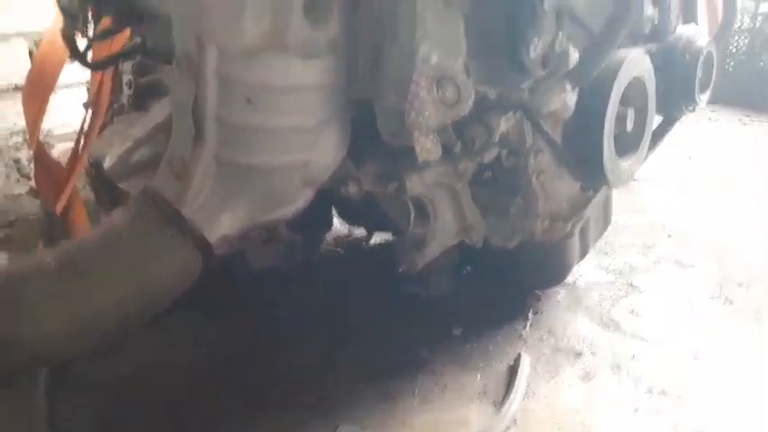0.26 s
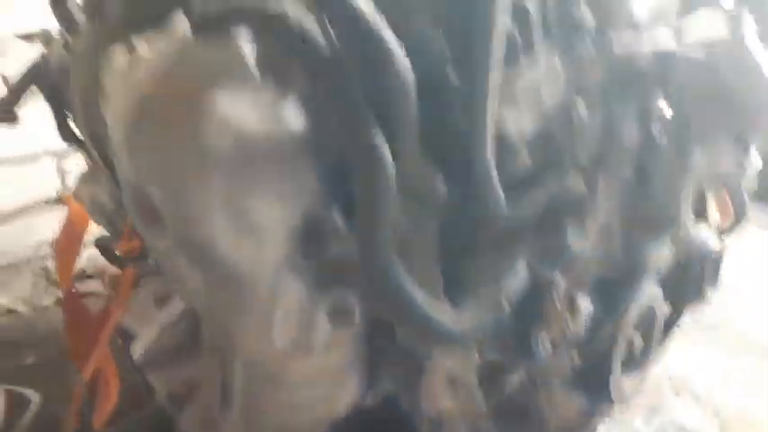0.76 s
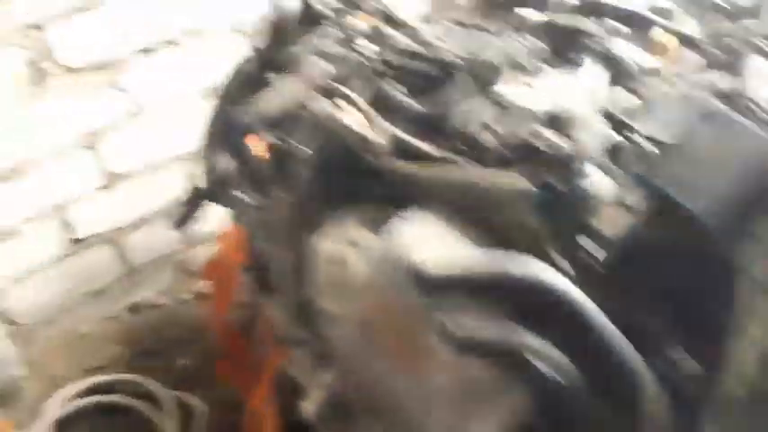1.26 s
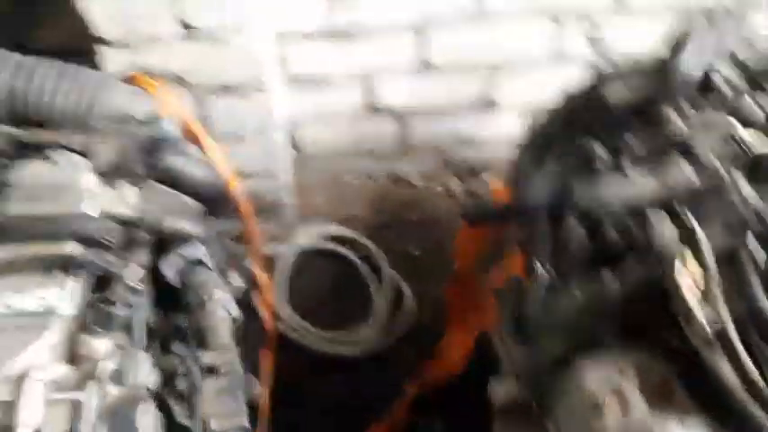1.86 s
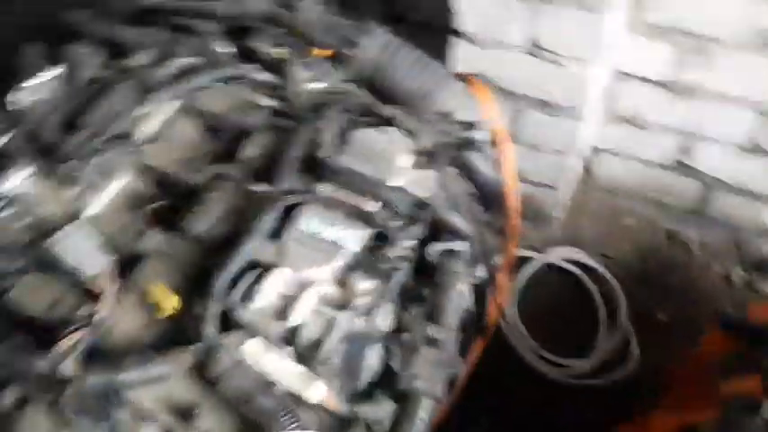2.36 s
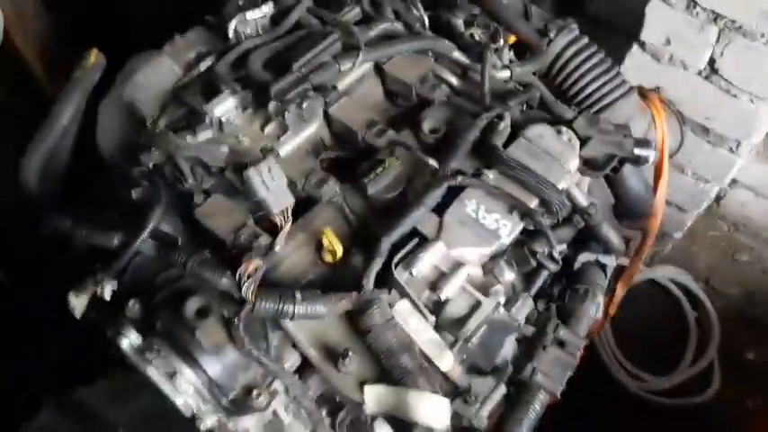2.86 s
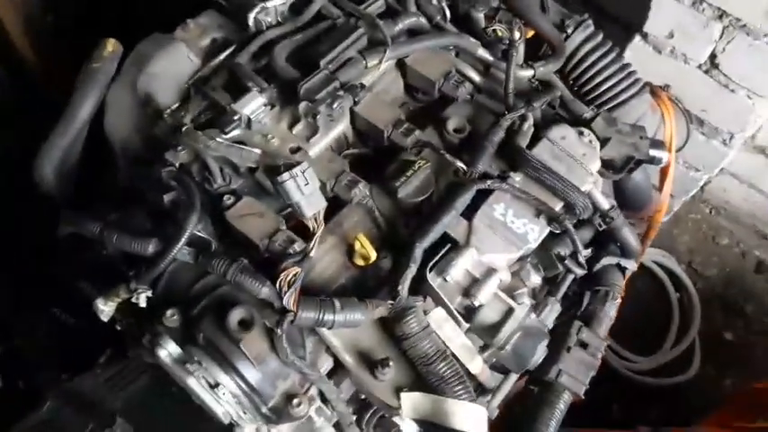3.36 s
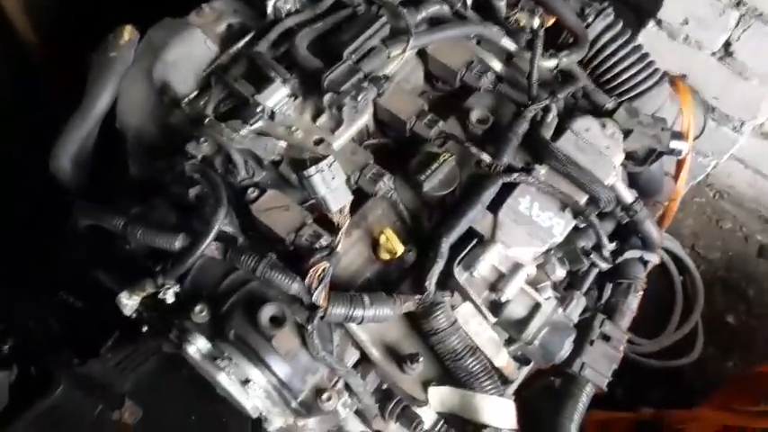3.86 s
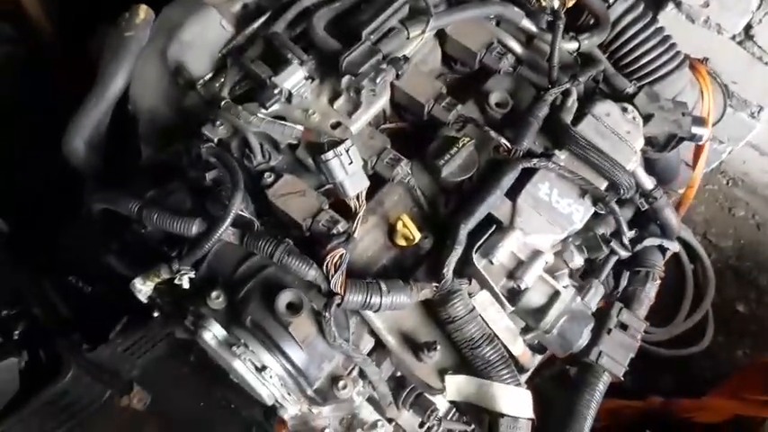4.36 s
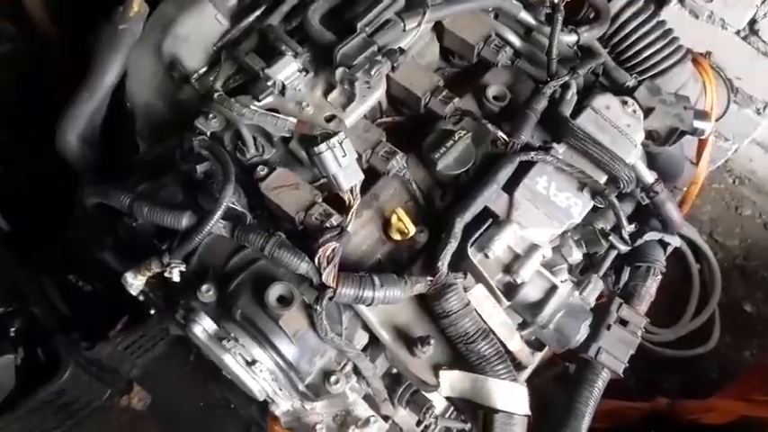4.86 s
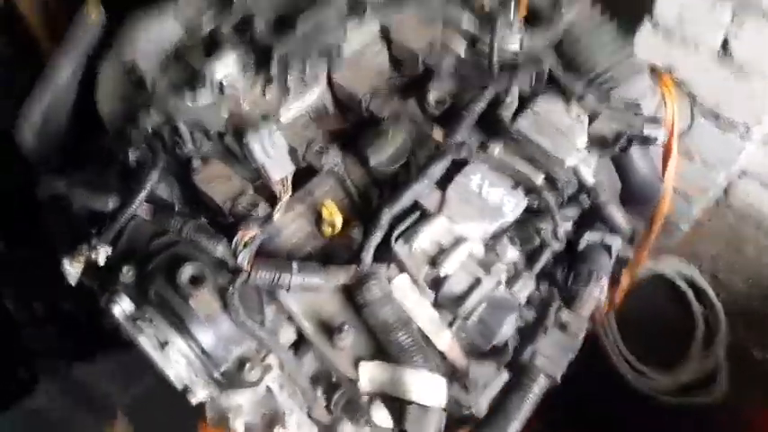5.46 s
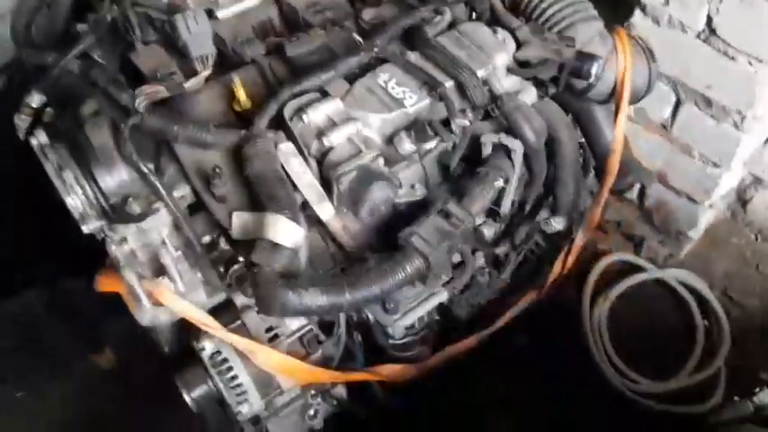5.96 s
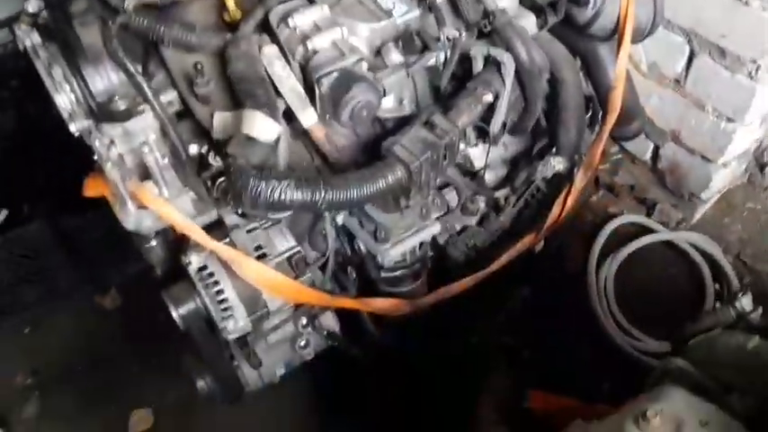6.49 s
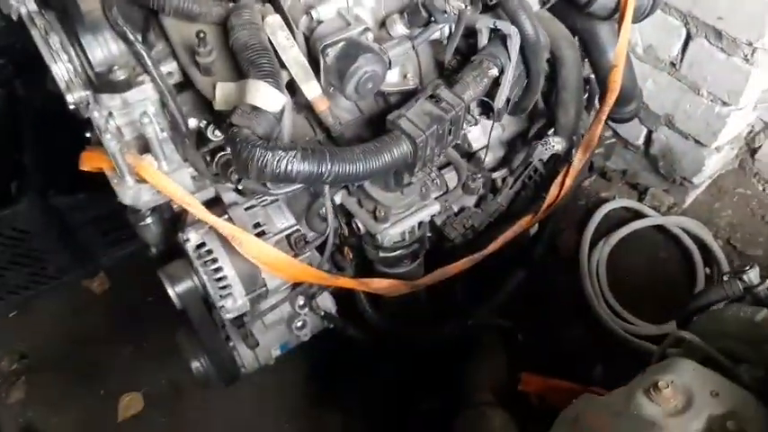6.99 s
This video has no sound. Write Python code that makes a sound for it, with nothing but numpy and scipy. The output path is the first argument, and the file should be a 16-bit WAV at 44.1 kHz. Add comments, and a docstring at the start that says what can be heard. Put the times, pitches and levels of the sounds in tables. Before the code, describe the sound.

Close, irregular handling noise from a handheld phone mixes with soles scuffing on gritty concrete. Light ticks and a cloth rustle come first, then a hard knock, the loudest sound. Bunches of clicks and crunchy scrapes come and go, with a short, quiet creak in a lull, and thin out near the end. Behind them the workshop is quiet, with a slight hiss and the faint hum of a far-off motor.

```python
"""Shuffling through a workshop

Someone shuffles over gritty concrete with a phone in the hand. Grit and the gripped case click, knock
and creak right at the microphone, each slip ringing a few damped resonances. Soles and fingers scuff
in between, and cloth rushes over the case as the phone is lifted at the start. Underneath sit a steady
room tone, a thin hiss and the faint hum of a far-off machine."""
import sys
import numpy as np
from scipy import signal
from scipy.fft import rfft, irfft
from scipy.io import wavfile
from scipy.ndimage import uniform_filter1d

SR = 44100
rng = np.random.default_rng(int(sys.argv[2]) if len(sys.argv) > 2 else 0)


def materialize(psi):
    """Save the field psi as 16-bit PCM at rate SR to the path in sys.argv[1].

    A 1-D psi becomes a single channel; in a 2-D psi each row is a channel.
    """
    bounded = np.clip(np.atleast_2d(psi).T, -1, 1)
    quanta = np.round(bounded * 32767).astype(np.int16)
    wavfile.write(sys.argv[1], SR, quanta)


N = 318825

# colour of the room tone: frequency_hz, relative_db
ROOM_SPECTRUM = [(25, -31), (42, -4.5), (75, -2.5), (145, -4), (195, -3), (361, -16.5), (487, -9.5),
                 (1300, -20.5), (4090, -31), (7600, -42.5), (10000, -41), (13000, -79)]
# drift of the distant motor: time_s, second_harmonic_hz, upper_harmonics_db, fundamental_db
MOTOR_DRIFT = [(0, 86.7, -79, -88), (.9, 82.5, -59.5, -67), (1.6, 87, -66.5, -69), (2.3, 95.8, -70, -69),
               (3.9, 96.8, -62.5, -64), (4.8, 96.14, -67.5, -64), (5.5, 97.8, -58, -63.5),
               (5.9, 95.6, -60, -66), (6.3, 96.4, -65.5, -71.5), (6.5, 95.5, -59.5, -78),
               (7.23, 95.3, -57, -69)]
# the motor's upper harmonics: multiple_of_second_harmonic, relative_db
MOTOR_HARMONICS = [(1, 0.5), (1.5, -16), (2, -8), (3, -19.5)]
# cloth sliding on the case: time_s, centre_hz, level_db
CLOTH_SWEEP = [(0, 2850, -62.5), (1.1, 2963, -57.5), (1.46, 3145, -58), (1.6, 3230, -99)]
# noise layers, a row each for scrape, rumble, grit, hiss: low_hz, high_hz, grains_per_s, scatter_db
NOISE_LAYERS = [(360, 1870, 300, 6), (97, 381, 55, -1), (1590, 3524, 380, 9.5), (10900, 17500, 650, -3.5)]
# bed of hand and clothes rubbing, plus a faint treble hiss that dips after the loudest knock:
# time_s, scrape_db, rumble_db, grit_db, hiss_db
NOISE_BED = [(0.0, -64.5, -59, -61.5, -71.5), (0.9, -50, -58, -59.5, -70), (1.45, -50, -56.5, -54.5, -69),
             (1.66, -60, -60, -58.5, -79), (2.06, -57, -72, -58.5, -90), (2.2, -67.5, -61, -66, -74.5),
             (2.75, -68.5, -70, -66, -74), (3.1, -57, -62, -66.5, -71.5), (3.9, -66.5, -65, -75, -71.5),
             (4.12, -68.5, -67.5, -74.5, -73), (4.58, -66.5, -63, -75, -73),
             (4.89, -63.5, -65.5, -72.5, -72), (5.25, -62, -67, -72.5, -73), (5.6, -50, -53, -52, -69),
             (6.22, -57, -65, -50.5, -65.5), (6.36, -61.5, -64.5, -58, -70), (7.05, -63, -65.5, -68, -72),
             (7.23, -55.5, -49, -55, -63.5)]
# scuffs of soles and fingers: peak_s, rise_s, fall_s, scrape_db, rumble_db, grit_db, hiss_db
SCUFF_SWELLS = [(1.145, 0.093, 0.049, -46.5, -40.5, -52, -73), (1.476, .013, 0.036, -39, -36, -20.5, -47.5),
                (1.533, 0.055, .035, -26.5, -25.5, -34.5, -48.5),
                (1.625, 0.055, 0.035, -52, -45.5, -52.5, -67), (1.754, .06, 0.22, -40, -39, -44, -63.5),
                (1.877, 0.041, 0.029, -29.5, -32, -43, -78), (2.109, 0.012, 0.043, -26.5, -38, -34, -57),
                (2.236, 0.0449, 0.092, -49.5, -38, -74, -88), (2.306, 0.035, .03, -49.5, -50, -59, -79),
                (2.41, 0.094, 0.05, -54.5, -50.5, -60, -74), (2.63, 0.082, .1, -53.5, -61, -66, -73.5),
                (2.706, 0.11, 0.022, -47.5, -71, -52.5, -82), (2.957, 0.22, .1, -43, -53, -58.5, -80),
                (3.143, 0.023, .07, -47.5, -47, -51.5, -76), (3.211, .026, 0.051, -33, -44, -43, -76),
                (3.43, 0.29, 0.072, -64, -52, -81, -80), (3.51, 0.0684, 0.45, -48.5, -57.5, -55, -80),
                (3.64, .035, 0.053, -34.5, -63, -45, -66), (3.706, 0.089, .1, -37, -58, -48.5, -68),
                (3.749, 0.044, 0.053, -32, -27, -62, -77), (3.781, .1, 0.068, -37, -58, -51, -71),
                (5.335, 0.12, 0.18, -52.5, -59, -58, -80), (5.484, 0.035, 0.13, -28.5, -39, -39, -74),
                (5.534, 0.054, .06, -30, -25.5, -37.5, -56),
                (5.631, 0.233, 0.059, -53.5, -43.5, -48.5, -57.5), (5.962, .35, 0.36, -51, -55.5, -52, -57),
                (6.219, 0.22, 0.074, -54, -52.5, -52, -70.5)]
# clicks of grit and case: time_s, ring_db, ring_hz, ring_q, thump_db, snap_db, crack_db, tick_db
CLICK_HITS = [(0.16, -72, 985, 0.7, -54, -36, -45, -55), (0.2837, -39, 674.0, 0.63, -39.5, -42, -70, -59),
              (0.6668, -33, 710, 0.8, -38, -37, -69, -64), (0.8101, -36, 870, 1, -40.5, -43, -67, -54),
              (0.8782, -27, 990.0, 0.36, -38, -36, -62, -52), (1.0496, -38, 585, 5.2, -62, -37, -58.5, -56),
              (1.1146, -15, 2330, 3.2, -30.5, -14, -28.5, -33.5),
              (1.1373, -24, 925, 0.76, -31, -28, -52, -54),
              (1.1528, -57.0, 537.0, 0.38, -18, -46.5, -51, -42),
              (1.219, -37.5, 1080.0, 0.69, -59.0, -29, -50, -55),
              (1.245, -36, 1010.0, 1.5, -58, -35, -61, -54),
              (1.4946, -25.5, 710.0, 0.43, -16.5, -28, -35, -32.5), (1.522, 5, 940, 0.34, 0, 1, -24, -15.5),
              (1.5298, -29.5, 655.0, 2, -29.5, -12.5, -32.5, -20),
              (1.567, -37, 700.0, 0.97, -32, -47, -52, -53.5),
              (1.5835, -33.0, 700.0, 0.93, -31, -40, -65, -56),
              (1.617, -16.5, 960, 0.49, -26.5, -11.5, -20, -28),
              (1.637, -31.5, 720.0, 0.89, -40, -38, -68, -64), (1.849, -45, 535, 1.6, -43, -22, -51, -36),
              (1.8766, -50, 1070.0, 0.85, -39, -21, -33, -35), (1.9497, -32, 620, 1.5, -45, -43, -60, -68),
              (2.0128, -25, 660, 1.8, -44.0, -35, -61, -65),
              (2.0794, -21, 645.0, 0.99, -37.0, -30.0, -46, -63),
              (2.0955, -34, 790, 1.1, -39, -36, -54, -60), (2.103, -31, 1430, 4.4, -40, -6.5, -18.5, -29),
              (2.108, -15.5, 1250, 1.6, -31, -9, -26, -31), (2.215, -37, 700.0, 1.1, -49.0, -39, -50, -61),
              (2.242, -28.5, 790, 0.81, -41.5, -42, -75, -68),
              (2.2865, -31, 700.0, 0.88, -49, -42, -60, -49),
              (2.2975, -8.5, 338, 0.65, -28, -1.5, -35, -31),
              (2.3183, -11.5, 341, 0.72, -43, -7.5, -29, -44),
              (2.3417, -22.5, 686, 1.4, -23, -22.5, -37, -46),
              (2.384, -45.0, 600.0, 0.41, -32, -43, -54, -52),
              (2.4212, -31.5, 612, 0.36, -22.0, -33, -44, -42.5),
              (2.629, -31, 1220, 1.9, -43, -21.5, -50, -53),
              (2.6462, -11.5, 699.0, 0.6, -14.5, -11, -40, -48),
              (2.672, -18, 1070.0, 1.3, -23, -12, -44, -47), (2.6782, -6, 734, 1.35, -15, -6.5, -41, -51),
              (2.7957, -25.5, 970, 2.3, -43, -27.5, -45, -45),
              (2.8721, -40, 1090, 5.9, -52, -37.0, -55.5, -50),
              (2.9526, -24, 544, 4.1, -36, -45, -60.5, -56),
              (2.992, -30.5, 1090, 4.1, -37, -29.5, -48, -52),
              (3.0584, -24.5, 1070, 0.91, -45, -32, -61.5, -59),
              (3.136, -21.5, 680, 0.49, -23, -27, -62, -55),
              (3.1536, -23.0, 1080.0, 3.6, -42, -25.5, -53, -53),
              (3.1966, -10, 1190, 0.78, -27, -7, -47, -52),
              (3.211, -13.5, 704, 2.4, -22.5, -10.5, -48.5, -52),
              (3.2142, -23, 760.0, 0.85, -24.5, -35.0, -63, -54),
              (3.2219, -8.5, 724, 1.35, -15, -10, -23, -27),
              (3.2353, -28, 890.0, 1.3, -31.5, -39.5, -62.5, -59),
              (3.2872, -38.5, 785.0, 3.4, -45, -23.5, -42, -42),
              (3.3176, -33.5, 1110, 5.4, -38, -14.5, -28, -33),
              (3.3443, -28.5, 880, 2.5, -35, -21, -21.5, -28),
              (3.364, -32, 1074, 1.7, -41, -50.0, -67, -57), (3.378, -46, 1200.0, 1.1, -50, -43, -64, -58),
              (3.3945, -18.5, 625, 0.85, -20, -27.5, -47, -61),
              (3.58, -30, 1010.0, 2.3, -36.5, -47.0, -68, -57),
              (3.5903, -38, 1000.0, 1.6, -58.5, -30, -47, -60),
              (3.6317, -13, 980, 2.3, -13.5, -9.5, -30.5, -32),
              (3.645, -35.0, 1110.0, 2.2, -46, -24, -33, -38), (3.6827, -14, 760, 0.7, -14, -20, -42, -50),
              (3.7135, -14, 1080.0, 0.62, -43, -11, -27.5, -49),
              (3.7273, -13, 790.0, 0.67, -14, -20.5, -58, -48.5),
              (3.7386, -5.5, 685, 0.8, -15, -5.5, -41, -41), (3.7467, -6, 690, 0.97, -28, -9.5, -42, -31),
              (3.765, -14.5, 805.0, 0.76, -13, -17, -41, -44), (3.7734, -13, 820, 0.98, -27, -14, -45, -45),
              (3.791, -6.5, 1080, 1.3, -9.5, -14.5, -34, -37),
              (3.8952, -40, 817, 1.4, -50, -36.5, -50, -57),
              (4.0957, -21.0, 1040.0, 0.5, -48, -28.5, -57, -56),
              (4.1243, -17.5, 898, 0.74, -28, -28.5, -49, -53),
              (4.6485, -18, 1250, 1, -39, -39, -52.5, -58.5),
              (5.1079, -39.5, 1066, 3, -43.5, -41, -52, -59),
              (5.3317, -29, 1182, 4.5, -37.5, -31.5, -42, -44),
              (5.4086, -10.5, 1110, 2, -30, -11, -25.5, -38),
              (5.4298, -37.0, 1002, 1.2, -42.0, -31, -51, -50),
              (5.449, -34, 550.0, 1.1, -41.0, -25.5, -44, -42),
              (5.48, -10.5, 770.0, 0.77, -18, -14, -36, -32.5),
              (5.4878, -11.5, 1200, 3, -18.5, -6.5, -24.5, -30),
              (5.494, -20, 875.0, 0.61, -24, -18.5, -42, -38), (5.5275, -16, 750, 0.9, -29, -11, -32, -36),
              (5.5396, -20, 960.0, 0.72, -35, -15.5, -38, -25),
              (5.5515, -17.5, 730, 0.35, -20, -13, -37, -22), (5.659, -44, 960.0, 0.7, -42, -39, -36, -53),
              (5.96, -36, 780.0, 1.2, -36, -55, -41.5, -51), (6.184, -41, 640, 1.3, -39, -54, -66, -60),
              (6.201, -33.5, 596.0, 1.12, -39, -48, -64, -53),
              (6.2123, -34, 670.0, 1.4, -35, -50.0, -55, -50),
              (6.2236, -34, 790.0, 1.85, -42, -52, -60, -52), (6.239, -32, 630, 1.3, -37.5, -55, -57, -49),
              (6.263, -36.5, 636.0, 1.6, -40, -53, -62, -56),
              (6.9009, -46, 716.0, 1.5, -62.5, -39.5, -63.5, -54.5),
              (7.119, -45, 730.0, 0.78, -36, -39, -45, -50), (7.1245, -39.5, 620.0, 1, -38, -60, -68, -61)]
# slips in one slow creak of the case: time_s, peak_db
CREAK_SLIPS = [(4.7156, -28), (4.7355, -31), (4.7522, -33), (4.7699, -27), (4.788, -26.5), (4.804, -27),
               (4.8196, -28), (4.8372, -32), (4.851, -28), (4.8689, -27), (4.8873, -26.5), (4.9099, -26.5)]

PING_SAMPLES, LEAD_SAMPLES = 1600, 300  # length of one ping, and of its run-up


def undb(db):
    """Decibels to amplitude."""
    return 10 ** (np.asarray(db) / 20)


def level(x, db):
    """Set the RMS level."""
    return x * undb(db) / np.sqrt(np.mean(x ** 2))


def band(x, lo_hz, hi_hz, order=2):
    """Band-pass filter."""
    sos = signal.butter(order, [lo_hz, min(hi_hz, .45 * SR)], "bandpass", fs=SR, output="sos")
    return signal.sosfilt(sos, x)


def curves(table):
    """One automation curve for each column after the time."""
    times, *columns = np.transpose(table)
    return [np.interp(np.arange(N) / SR, times, column) for column in columns]


def wobble(rate_hz):
    """Slewed random steps, never beyond 2 either way."""
    step = (np.arange(N) * min(rate_hz, 1000) / SR).astype(int)
    held = rng.standard_normal(N // 32)[step]
    return 2 * np.tanh(.7 * uniform_filter1d(held, int(SR / rate_hz)))


def ping(hz, q, lag_s=0, rise=.15):
    """A damped resonance with peak 1: it swells over about `rise` cycles and rings longer at higher q."""
    cycles = hz * ((np.arange(PING_SAMPLES) - LEAD_SAMPLES) / SR - lag_s)
    envelope = np.where(cycles < 0, np.exp(-(cycles / rise) ** 2), 1 / np.cosh(np.pi * cycles / q))
    wave = envelope * np.sin(2 * np.pi * cycles)
    return wave / np.abs(wave).max()


def room_tone(level_db=-61):
    """The air of the workshop: steady, dark noise."""
    bins_hz = np.maximum(np.arange(N // 2 + 1) * SR / N, 1)
    hz, db = np.transpose(ROOM_SPECTRUM)
    colour = undb(np.interp(np.log(bins_hz), np.log(hz), db, left=-80, right=-80))
    return level(irfft(rfft(rng.standard_normal(N)) * colour, N), level_db)


def motor_hum():
    """A distant motor picks up a little speed; its harmonics waver in level."""
    hz, upper_db, fundamental_db = curves(MOTOR_DRIFT)
    phase = 2 * np.pi * np.cumsum(hz * (1 + .0059 * wobble(.99))) / SR
    upper = sum(undb(upper_db + db + 1.2 * wobble(2.8)) * np.sin(multiple * phase)
                for multiple, db in MOTOR_HARMONICS)
    fundamental = undb(fundamental_db + 1.2 * wobble(1.3)) * np.sin(phase / 2)
    return np.sqrt(2) * (upper + fundamental)


def cloth_rush(half_width_hz=410, sheen_hz=6600):
    """Cloth slides on the case: a narrow band of noise creeps upward, with a faint sheen above."""
    centre_hz, db = curves(CLOTH_SWEEP)
    lowpass = signal.butter(3, half_width_hz, fs=SR, output="sos")
    slow = signal.sosfilt(lowpass, rng.standard_normal((2, N)))
    carrier = np.exp(2j * np.pi * np.cumsum(centre_hz) / SR)
    rush = level(((slow[0] + 1j * slow[1]) * carrier).real, 0)
    sheen = level(band(rng.standard_normal(N), .92 * sheen_hz, 1.09 * sheen_hz), db=-22.5)
    return undb(db) * (rush + sheen)


def layer_envelopes(swell_db=20, roundness=1.21):
    """Level in dB of each noise layer: the bed of rubbing and hiss plus every scuff's swell and fade."""
    t = np.arange(N) / SR
    power = undb(curves(NOISE_BED)) ** 2
    for peak_s, rise_s, fall_s, *peak_db in SCUFF_SWELLS:
        near = slice(max(int((peak_s - 2 * rise_s) * SR), 0), int((peak_s + 2 * fall_s) * SR))
        from_peak = np.maximum((peak_s - t[near]) / rise_s, (t[near] - peak_s) / fall_s)
        power[:, near] += undb(np.array(peak_db)[:, None] - swell_db * from_peak ** roundness) ** 2
    return 10 * np.log10(power)


def scuffs(crunches_per_s=500):
    """Friction over a faint hiss: smooth when light, crunchy under pressure, with stick-slip stutter."""
    stutter = wobble(45)
    layers_db = layer_envelopes()
    scrape_db, _, grit_db, hiss_db = layers_db
    pressure = np.clip((scrape_db + 60) / 55, .15, .9)
    crushed = rng.random(N) < crunches_per_s / SR
    crunch = level(crushed * rng.standard_normal(N) * rng.exponential(size=N), 0)
    body = np.zeros(N)
    for db, (lo_hz, hi_hz, grains_per_s, scatter_db) in zip(layers_db, NOISE_LAYERS):
        rub = np.sqrt(1 - .25 * pressure) * rng.standard_normal(N) + np.sqrt(.4 * pressure) * crunch
        grains = rub * undb(pressure * scatter_db * (wobble(grains_per_s) + .16 * stutter))
        body += undb(db) * level(band(grains, lo_hz, hi_hz, order=3), -3.2)
    # dust sits between grit and hiss, sizzle brightens strong hiss, rasp tops the hard scrapes
    dust = level(band(rng.standard_normal(N), 3500, 6000), 2.5) * undb(.82 * grit_db + .5 * hiss_db)
    sizzle = level(band(rng.standard_normal(N), 13800, 16000), 21) * undb(1.5 * hiss_db)
    rasp = level(band(rng.standard_normal(N), 4100, 10500), .3)
    rasp *= undb(.52 * scrape_db + .573 * grit_db + .47 * hiss_db)
    return body + dust + sizzle + rasp


def clicks(bounce=.2, rattle_t60_s=.014, tick_decay_s=.00047):
    """Each slip rings the case, snaps and cracks high, bounces once, thumps the diaphragm and rattles."""
    case, cracks, ticks = np.zeros((3, N + PING_SAMPLES))
    t = np.maximum(np.arange(PING_SAMPLES) - LEAD_SAMPLES, 0) / SR
    rattle_fade = (t > 0) * undb(-7) * 1000 ** (-t / rattle_t60_s)
    tick_fade = (t > 0) * undb(-3) * np.exp(-t / tick_decay_s)
    chances = rng.random((len(CLICK_HITS), 3))
    noises = rng.standard_normal((len(CLICK_HITS), 2, PING_SAMPLES))
    for row, (tuning, rebound, gap), (tick_noise, rattle_noise) in zip(CLICK_HITS, chances, noises):
        time_s, ring_db, ring_hz, ring_q, thump_db, snap_db, crack_db, tick_db = row
        q = max(ring_q, .4)
        ring = undb(ring_db) * (ping(ring_hz, q, rise=.28) + .1 * ping(ring_hz, 4.4 * q, rise=.27))
        # a snap that stands out over the ring is higher
        snap_hz = 2120 * 2 ** (.018 * np.clip(snap_db - ring_db, -12, 16))
        snap = undb(snap_db) * (ping(snap_hz, q=.84, rise=.14) + .15 * ping(snap_hz, q=3.2, rise=.31))
        hit = ring + band(snap, .4 * snap_hz, 1.72 * snap_hz)
        bounce_s = .00056 + .0011 * gap
        hit += bounce * np.tanh(3 * (2 * rebound - 1)) * np.roll(hit, int(bounce_s * SR))
        # a thump that stands out over the snap is deeper
        thump_hz = 216 * 2 ** (-.012 * np.clip(thump_db - snap_db, -5, 20)) * (.84 + .19 * tuning)
        thump = undb(thump_db) * ping(thump_hz, q=.34, lag_s=.0017, rise=.24)
        rattle = undb(ring_db) * band(rattle_noise, 1.1 * ring_hz, 2 * ring_hz)
        rattle += .63 * undb(snap_db) * band(rattle_noise, .44 * snap_hz, 1.3 * snap_hz)
        start = int(time_s * SR) - LEAD_SAMPLES
        span = slice(start, start + PING_SAMPLES)
        case[span] += hit + thump + rattle * rattle_fade
        cracks[span] += undb(crack_db) * ping(hz=4340 * (.77 + .25 * tuning), q=1.7, rise=.3)
        ticks[span] += undb(tick_db) * tick_noise * tick_fade
    # the case passes little above its top resonance; only cracks and ticks reach the mic by air
    through_case = band(band(case, 77, 3800, order=4), 30, 4300, order=3)
    through_air = band(cracks, 3000, 7200) + band(ticks, 9300, 16000)
    return (through_case + through_air)[:N]


def case_creak():
    """Uneven slips ring the same seam of the case, so all sound alike."""
    times_s, peak_db = np.transpose(CREAK_SLIPS)
    slips = np.zeros(N)
    slips[(times_s * SR).astype(int) - LEAD_SAMPLES] = -undb(peak_db)
    seam = ping(hz=890, q=.64, rise=.35) + .4 * ping(hz=2000, q=4) + .1 * ping(hz=1000, q=8)
    seam = band(band(seam, 360, 2600), 380, 2070)
    return signal.fftconvolve(slips, seam / np.abs(seam).max())[:N]


def scene():
    """Close handling and footwork over the quiet workshop, in mono."""
    return (clicks() + case_creak() + scuffs() + cloth_rush() + motor_hum() + room_tone())[None]


def record(dry, ceiling=.89, top_hz=15710, dc_offset=-.0005):
    """The phone flattens only the loudest peak, cuts the top and adds its converter's tiny offset."""
    limited = dry / (1 + np.abs(dry / ceiling) ** 8) ** (1 / 8)
    high_cut = signal.ellip(14, .3, 75, top_hz, fs=SR, output="sos")
    return signal.sosfilt(high_cut, limited) + dc_offset


dry = scene()
out = record(dry)
materialize(out)
```